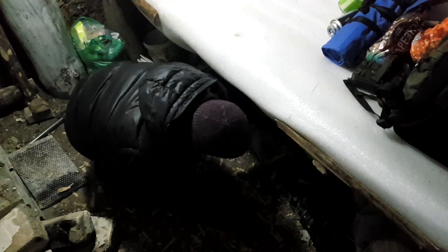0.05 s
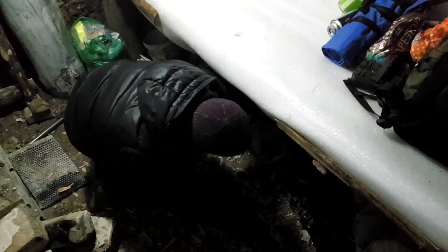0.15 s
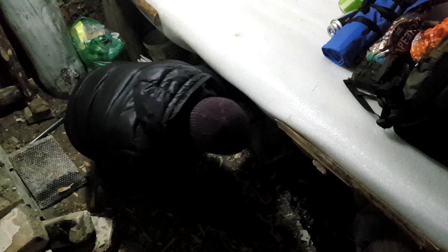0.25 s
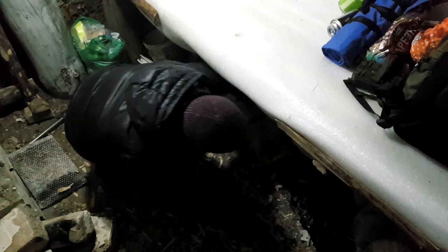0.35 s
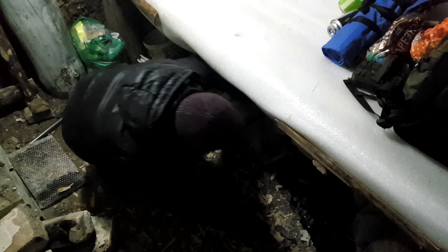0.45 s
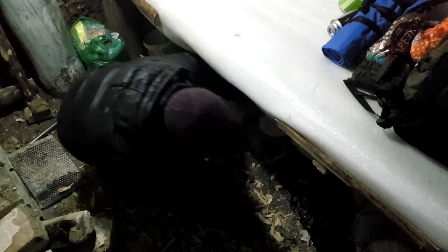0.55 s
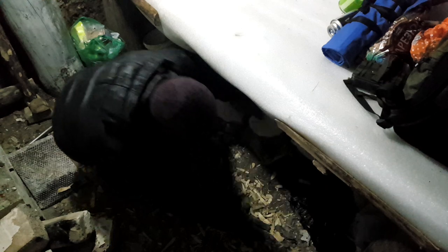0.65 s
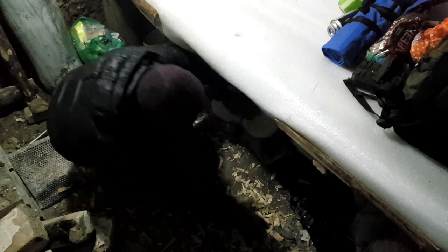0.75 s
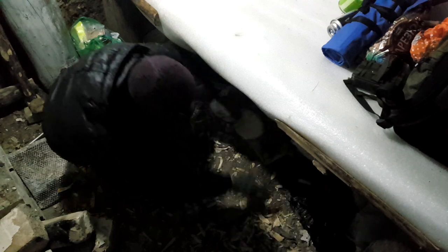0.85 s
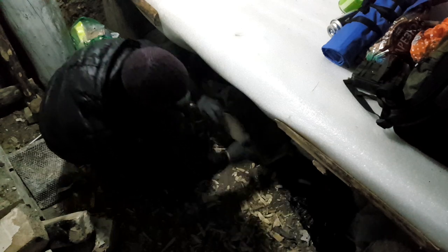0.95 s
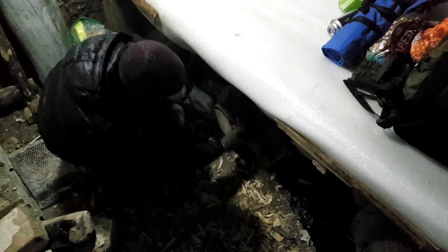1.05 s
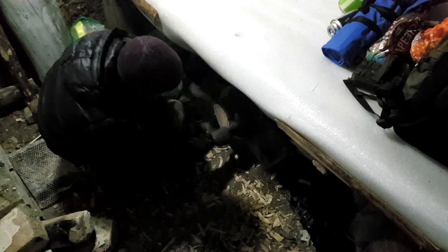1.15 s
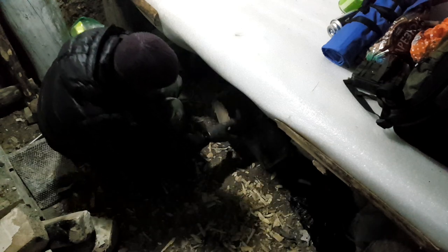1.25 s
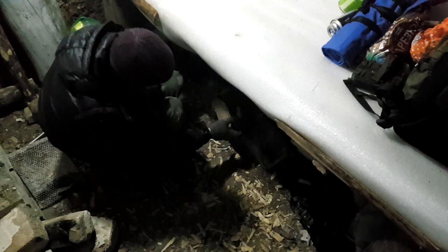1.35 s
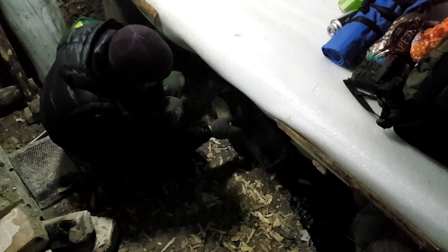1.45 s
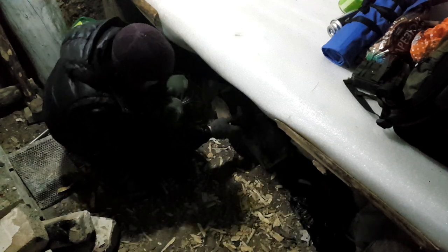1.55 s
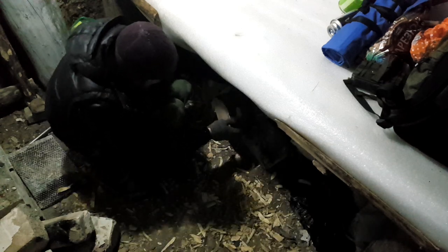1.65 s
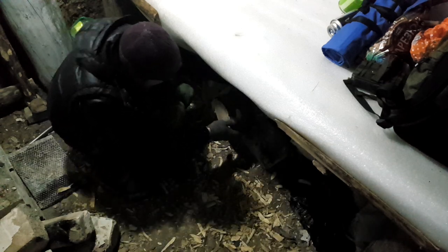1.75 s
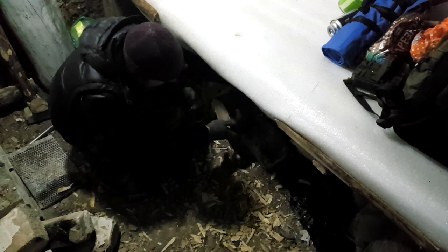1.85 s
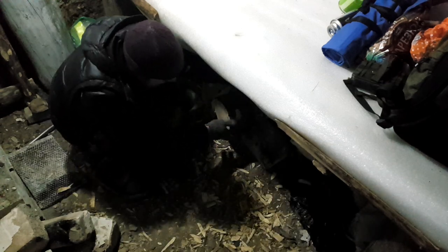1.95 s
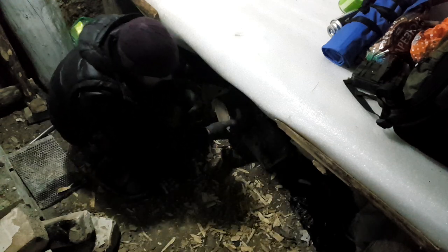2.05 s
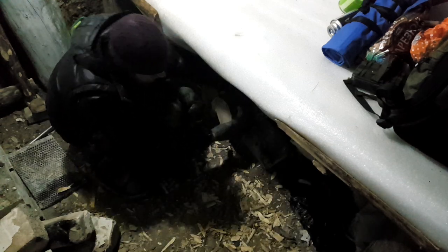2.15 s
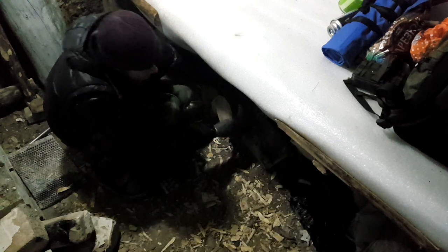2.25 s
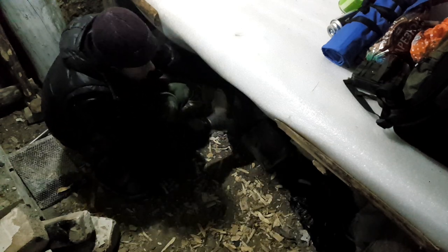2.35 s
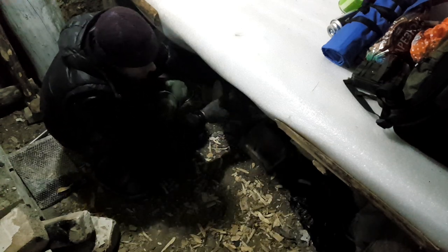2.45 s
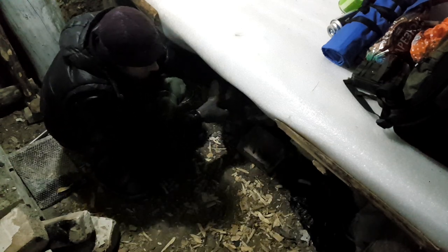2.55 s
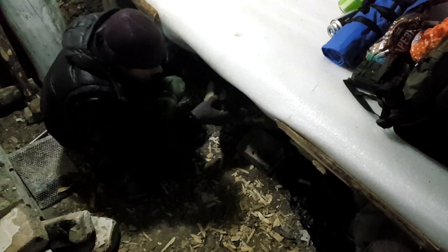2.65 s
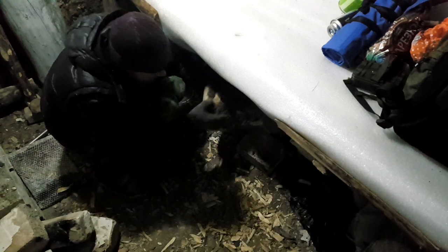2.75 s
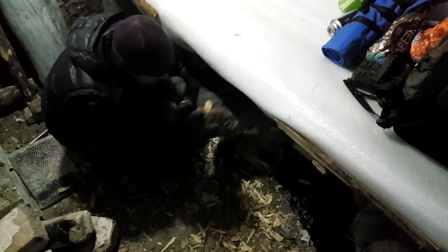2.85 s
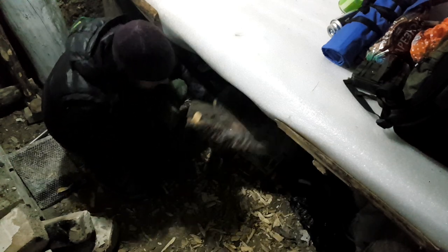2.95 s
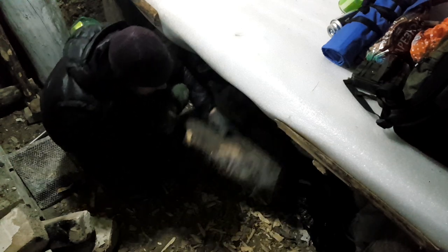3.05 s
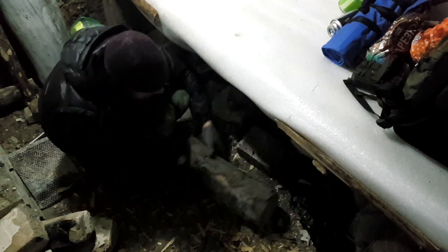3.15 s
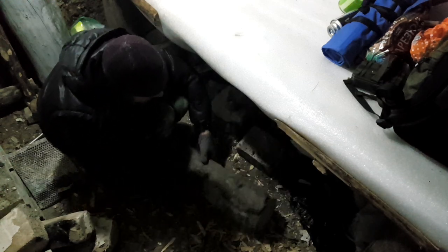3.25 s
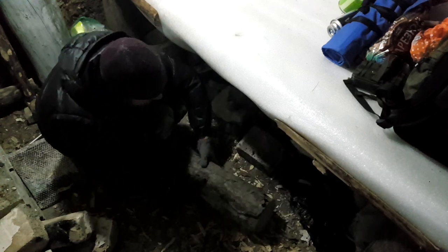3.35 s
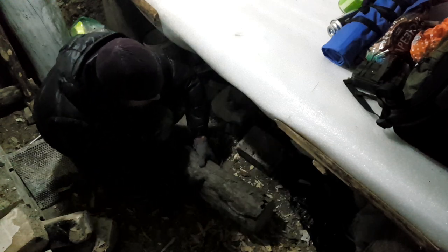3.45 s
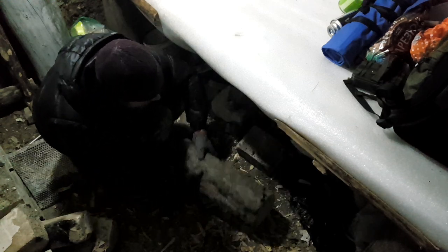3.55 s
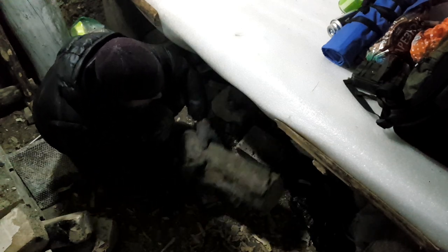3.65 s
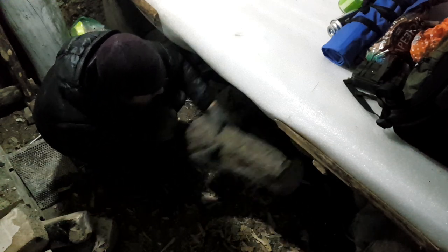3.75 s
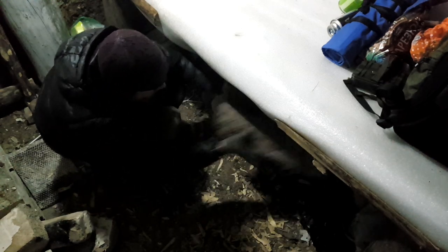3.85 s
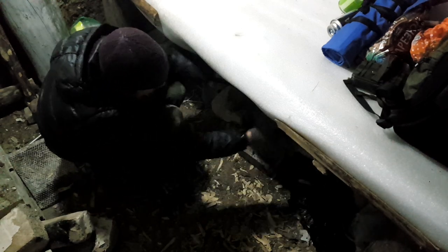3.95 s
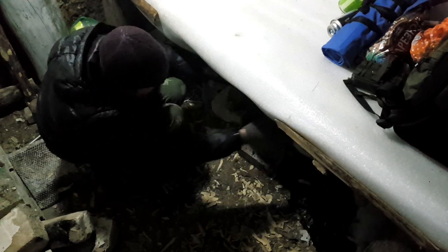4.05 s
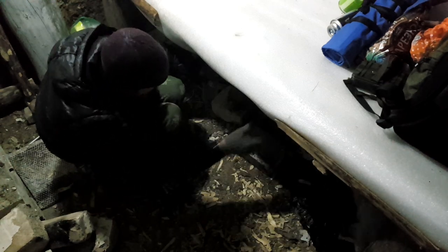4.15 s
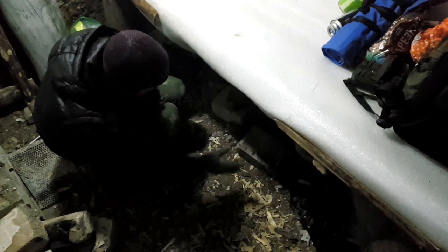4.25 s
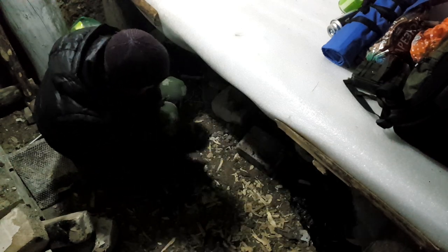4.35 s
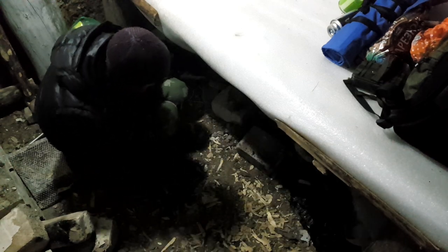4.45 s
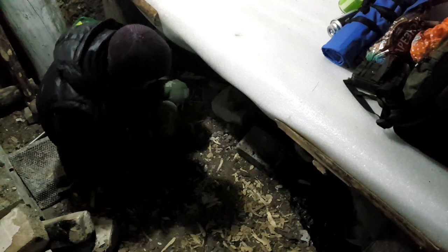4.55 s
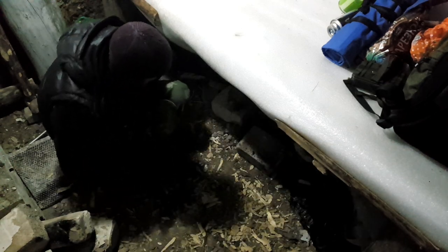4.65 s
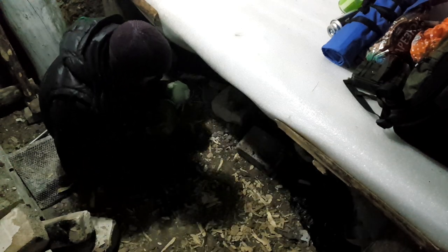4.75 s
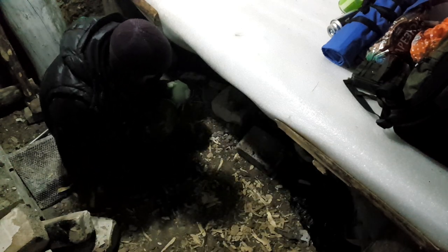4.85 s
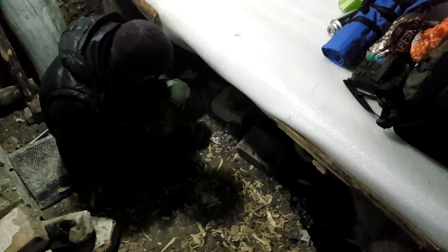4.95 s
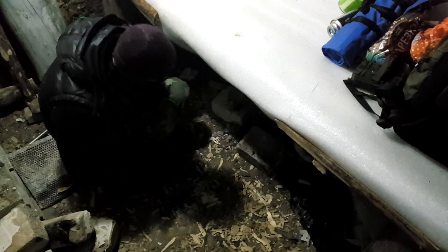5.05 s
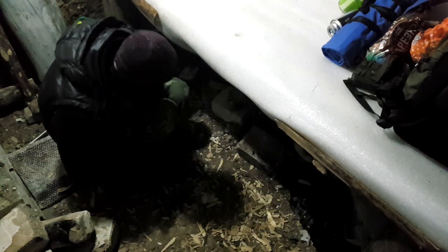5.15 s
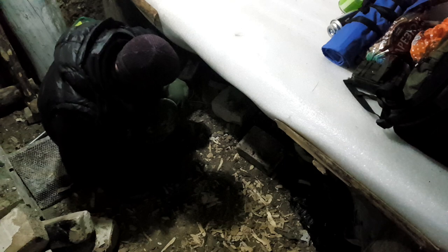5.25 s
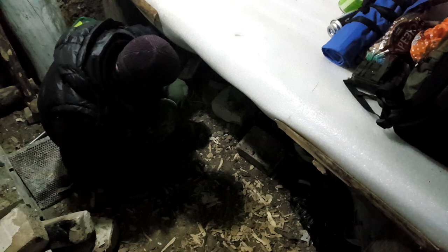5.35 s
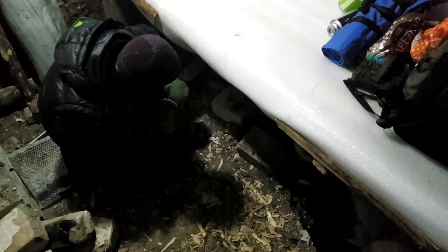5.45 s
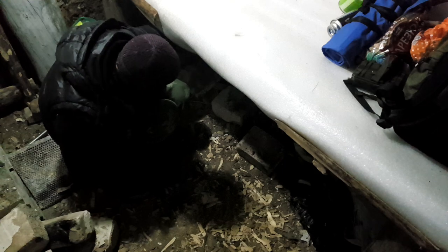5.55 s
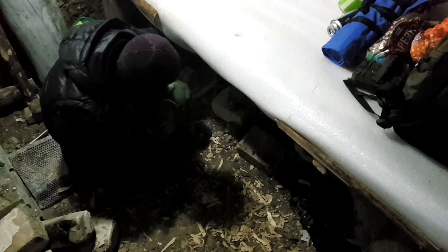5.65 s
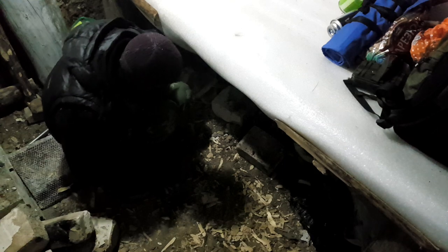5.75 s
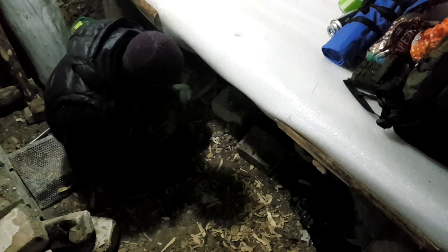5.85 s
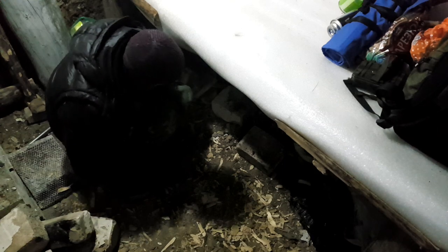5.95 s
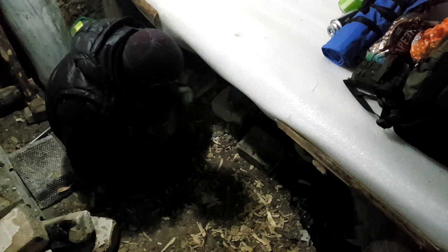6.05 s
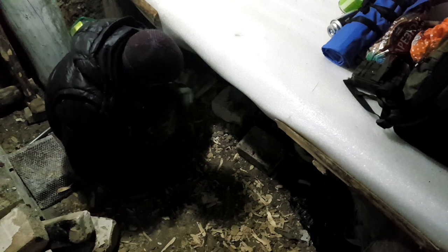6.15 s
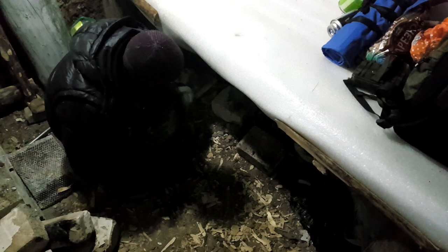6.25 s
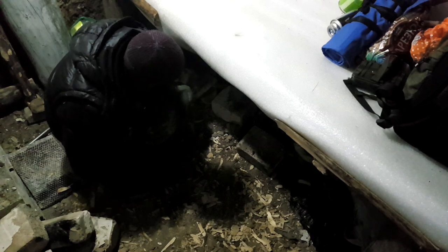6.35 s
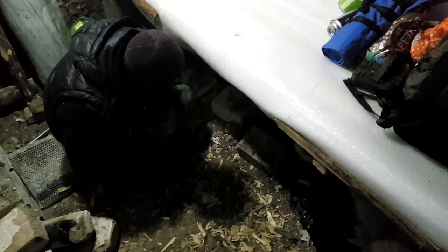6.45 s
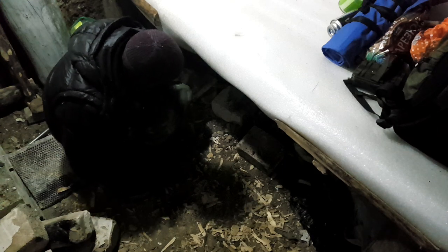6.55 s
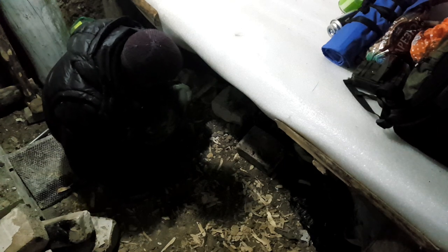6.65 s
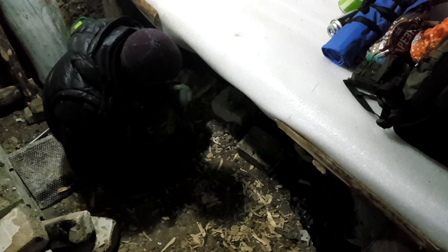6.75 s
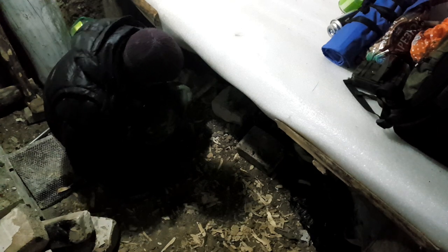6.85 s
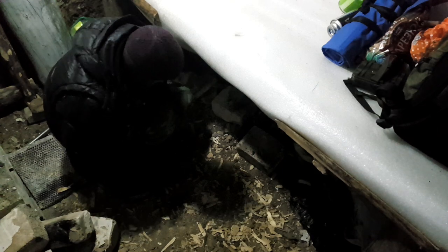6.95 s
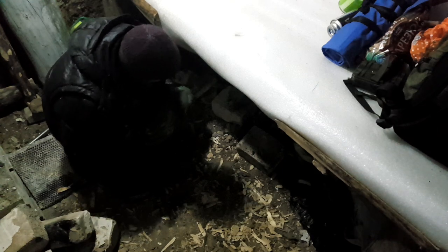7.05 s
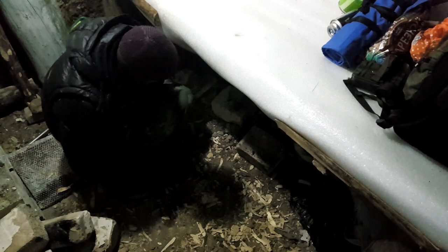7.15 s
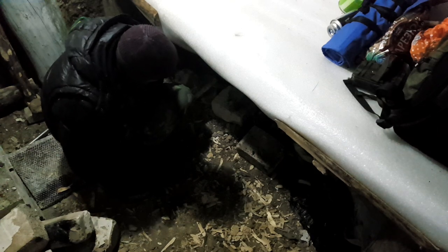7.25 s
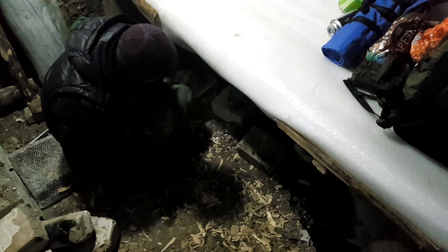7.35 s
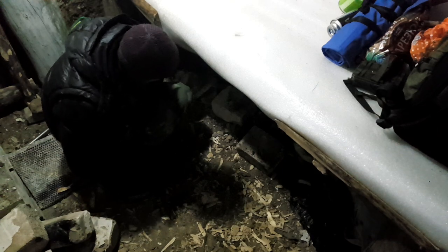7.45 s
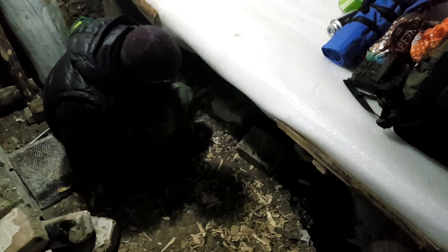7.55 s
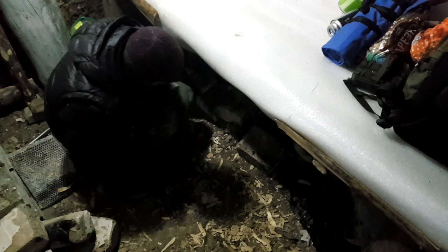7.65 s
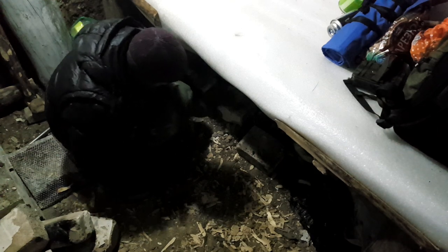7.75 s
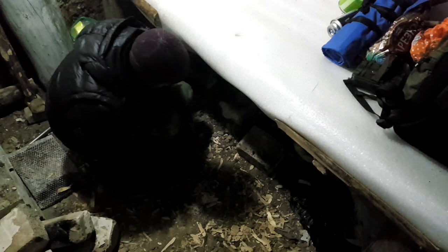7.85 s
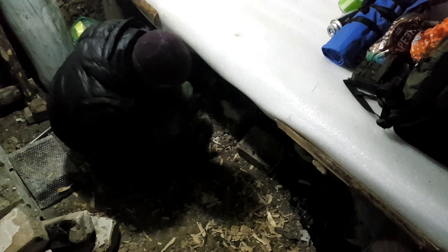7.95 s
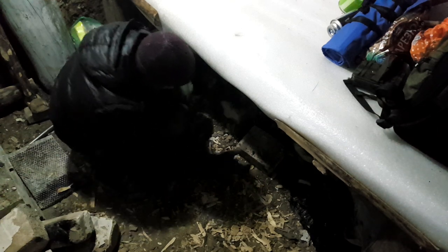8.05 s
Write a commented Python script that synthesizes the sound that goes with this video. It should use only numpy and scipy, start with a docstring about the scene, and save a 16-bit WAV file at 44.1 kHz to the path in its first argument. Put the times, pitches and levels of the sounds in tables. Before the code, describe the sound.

Someone shifts bricks on a dirt floor in a small shelter. Cloth rustles and grit rubs first, then a clattering scrape, lighter ticks and snapping chips. A brick lands hard with a double thud, another drops about a second later with deeper boom. A short falling squeak follows, then dull knocks, scrapes and rustling. Heard in stereo from just above, fairly dry, with faint hiss.

```python
"""Bricks moved over a dirt floor

Someone in a padded jacket crouches in a small shelter and moves bricks over dirt strewn with chips.
Bricks are damped modes driven by pushes and chatter; two heavy drops also boom in floor and room.
Random grains make drags, grit and the rustle of cloth and chips; chips snap as decaying noise.
Rubs and a squeak are rough gliding tones. Two ports above hear it all over faint hiss."""
import sys
import numpy as np
from scipy import signal
from scipy.fft import rfft, irfft
from scipy.io import wavfile
from scipy.ndimage import uniform_filter1d

SR = 44100
rng = np.random.default_rng(int(sys.argv[2]) if len(sys.argv) > 2 else 0)


def store_wav(level_fs):
    """Save 16-bit WAV to argv[1]."""
    pcm = np.round(np.clip(np.atleast_2d(level_fs), -1, 1) * 32767)
    wavfile.write(sys.argv[1], SR, pcm.T.astype(np.int16))


N = 357210  # samples

# Modes of a freely ringing brick. Each row: frequency in Hz, level in dB, 60 dB decay time in s.
BRICK_MODES = [(260, -21.5, 0.014), (308, 1.5, 0.21), (342.5, 0.5, 0.14), (430, 3.5, 0.07),
               (550, 0.5, 0.075), (702, -6, 0.15), (931, -10, 0.034), (1142.5, -9.5, 0.17),
               (1317, -9.5, 0.084), (1467, -6, 0.091), (1721, -4, 0.071), (2025, -1.5, 0.045),
               (2520, -11.5, 0.048), (2830, -7.5, 0.05), (3780, -11.5, 0.021)]
LOW_MODES = 6  # the first rows of the brick; the rest are its high modes
# Low modes of floor and room. Each row: frequency in Hz, level in dB, 60 dB decay time in s.
BOOM_MODES = [(53.7, 1.2, .3), (68.2, 12.4, 0.29), (86.5, 12.6, 0.314), (105.1, 9.3, 0.22),
              (119.8, 6.7, 0.39)]


def undb(db):
    """Decibels to amplitude ratio: 20 dB is a factor of ten."""
    return 10 ** (np.asarray(db) / 20)


def unit(x):
    """Normalise to unit root-mean-square amplitude."""
    return x / np.sqrt(np.mean(x ** 2))


def peak(x, db):
    """Normalise the largest excursion to a level in dB."""
    return x * undb(db) / np.max(np.abs(x))


def gains(table, size):
    """Frequency response through (Hz, dB) points, interpolated over log frequency."""
    hz, db = np.transpose(table)
    bin_hz = np.arange(size // 2 + 1) * SR / size
    return undb(np.interp(np.log(bin_hz + 1), np.log(hz), db))


def colour(x, table):
    """Linear filtering: multiply the spectrum by a frequency response."""
    return irfft(rfft(x) * gains(table, N), N)


def add(track, s, x):
    """Superposition: sum a sound into the track from time s in seconds."""
    i = int(s * SR)
    track[..., i:i + x.shape[-1]] += x[..., :N - i]


def damped(modes, share):
    """Added damping: only a share of each mode's decay time is left."""
    return [(hz, db, share * t60) for hz, db, t60 in modes]


def ring(x, modes, db=0):
    """Modal synthesis: a force drives decaying resonators; db reweights them for this contact."""
    out = 0
    for (hz, own_db, t60), more_db in zip(modes, db + np.zeros(len(modes))):
        r = np.exp(-np.log(1000) / (t60 * SR))  # pole radius: decay per sample
        w = 2 * np.pi * hz / SR
        mode = signal.lfilter([0, r * np.sin(w)], [1, -2 * r * np.cos(w), r * r], x)
        out = out + undb(own_db + more_db) * mode
    return out


def walk(rate_hz):
    """Slow random modulation: levels held a moment and slewed, with a spread near 1."""
    k = int(SR / rate_hz)
    held = np.repeat(rng.standard_normal(N // k + 1), k)
    return 1.32 * uniform_filter1d(held, k)[:N]


def grains(rate_hz, spread_db, patchy_db, patch_hz):
    """Granular excitation: random clicks of unequal size that come in patches, along three paths."""
    hit = rng.random(N) < rate_hz / SR
    size_db = spread_db * rng.exponential(size=N) + patchy_db * walk(patch_hz)
    return hit * rng.standard_normal((3, N)) * undb(size_db)


def hiss():
    """Stationary background noise: shaped random noise at a steady level, independent on each path."""
    # Each row: frequency in Hz, relative level in dB per Hz.
    spectrum = [(30, -12.5), (75, 6.5), (134, -1.5), (189, -29), (287, -13.5), (822, -24.5), (2540, -25.5),
                (8520, -23), (12300, -13), (16000, -20)]
    return unit(colour(rng.standard_normal((3, N)), spectrum)) * undb(-66.5)


def scrapes():
    """Addition of powers: each scrape swells, holds and fades over the restless shifting."""
    # Restless shifting. Each row: time in s, then levels in dB of the rumble in floor and room,
    # of the drag on the dirt and of the rustle of cloth and chips.
    stir = [(0.0, -59, -70.5, -78), (0.399, -47, -53.5, -80), (0.65, -59, -79.5, -64.5),
            (1.05, -51, -72, -49), (1.45, -49.5, -53, -78), (1.85, -53.5, -53, -47),
            (2.3, -53.5, -62.5, -51.5), (3.1, -47.5, -51, -43), (3.16, -31.5, -62, -43),
            (3.43, -62, -75, -57), (3.7, -92, -81.5, -64), (3.988, -48.5, -80, -74),
            (4.078, -34.5, -67, -62), (4.502, -57.5, -70, -59.5), (4.737, -61, -68.5, -66),
            (5.03, -51, -59, -65), (5.41, -61, -53, -47), (5.5, -41.5, -53, -55.5), (5.9, -53.5, -72, -62),
            (6.0, -58.5, -78, -79), (6.2, -53, -66, -83), (6.47, -64, -57, -58), (6.57, -71.5, -77, -72),
            (6.74, -69, -80, -74), (6.97, -56, -75, -74), (7.33, -63, -74, -75), (7.622, -68, -81.5, -86),
            (7.76, -49.5, -63, -68), (7.92, -52, -64, -70), (8.1, -63, -69.5, -60)]
    # Scrapes. Each row: time of reaching full level in s, hold in s, swell and fade in s per 20 dB,
    # then levels in dB of the drag, of the grit on brick and of the rustle.
    strokes = [(0.199, 0.15, 0.16, 0.23, -78, -47, -40.5), (0.52, 0.014, 0.058, 0.076, -58, -55.5, -54.5),
               (0.88, 0.0033, 0.42, 0.097, -91, -55.5, -49.5), (1.01, 0.0092, 0.15, 0.1, -72, -48.5, -67),
               (1.24, 0, 0.06, 0.16, -70, -70, -43.5), (1.37, 0, 0.26, 0.19, -73, -49.5, -46.5),
               (1.49, 0, 0.021, 0.065, -56, -34, -38), (1.578, 0.036, 0.025, 0.052, -40, -33.5, -41),
               (2.295, 0.0046, 0.038, 0.11, -65, -53, -41.5), (2.371, 0.02, 0.09, 0.13, -68, -40, -44),
               (2.575, 0.057, 0.065, 0.15, -70, -46, -44), (2.93, 0.018, 0.048, 0.054, -46.5, -40.5, -47),
               (3.022, 0.052, 0.01, 0.048, -50, -64, -38.5), (3.09, 0, 0.021, 0.026, -55, -21.5, -26),
               (3.159, 0.043, 0.074, 0.13, -49, -53.5, -47),
               (3.76, 0.067, 0.032, 0.14, -86.5, -64.5, -55.5),
               (4.029, 0.057, 0.046, .05, -41, -60.5, -44.5),
               (4.069, 0.037, 0.011, 0.068, -41.5, -27.5, -37), (4.14, 0.071, 0.048, 0.24, -43.5, -40, -41),
               (4.831, 0.17, 0.11, 0.68, -64, -53, -53.5), (5.19, 0.03, 0.17, 0.46, -79, -50, -49),
               (5.5, 0.02, 0.079, 0.15, -45, -41.5, -51.5), (5.604, 0.0058, 0.015, 0.12, -36, -40, -55),
               (5.756, 0.0029, 0.019, 0.067, -55, -42, -68), (5.82, 0.06, 0.11, 0.073, -48.5, -47, -43),
               (5.909, 0.0063, 0.035, 0.035, -64, -36.5, -56), (6.138, 0, 0.4, 0.58, -52.5, -57, -53.5),
               (6.77, 0.075, 0.022, .05, -54.5, -51, -51.5), (6.825, 0.022, 0.051, 0.061, -70, -42, -44.5),
               (6.97, 0.016, 0.069, 0.24, -58.5, -74, -59), (7.09, 0.038, 0.016, 0.083, -47, -46.5, -45.5),
               (7.408, 0.0013, 0.0064, 0.031, -82.5, -88.5, -71),
               (7.67, 0.008, 0.051, 0.042, -84.5, -84, -63), (7.743, 0.086, 0.0068, 0.074, -67, -58, -57),
               (7.825, 0.016, 0.019, 0.084, -46, -44, -41), (7.942, 0.014, 0.025, 0.064, -72, -65, -52)]
    t = np.arange(0, N / SR, .002)
    s, *columns = np.transpose(stir)
    rumble_db, drag_db, rustle_db = (np.interp(t, s, c) for c in columns)
    grit_db = drag_db - 3.5
    power = undb([drag_db, grit_db, rustle_db]) ** 2
    for s, hold, swell, fade, *db in strokes:
        under_db = 20 * np.maximum(np.maximum((s - t) / swell, (t - s - hold) / fade), 0)
        power = power + undb(np.array(db)[:, None] - under_db) ** 2
    levels = [undb(rumble_db), *np.sqrt(power)]
    return [np.interp(np.arange(N) / SR, t, level) for level in levels]


def crushed_grit():
    """Resonant and direct radiation: grains stir the damped high brick modes and sound by themselves."""
    # crumbs that crush suddenly and die away
    bursts = (rng.random(N) < 45 / SR) * rng.random(N)
    crush = signal.lfilter([1], [1, -np.exp(-1 / (0.011 * SR))], bursts)
    grit = grains(5000, 1.6, 2.7, 40) * (1 + 0.9 * crush)
    # each mode swells and fades alone, with a spread near 4 dB
    high_modes = damped(BRICK_MODES, 0.16)[LOW_MODES:]
    ringing = sum(undb(4 * walk(9)) * ring(grit, [mode]) for mode in high_modes)
    bare = colour(grit, [(500, -10.5), (1000, -2.0), (3500, -1.5), (7000, -18.5)])
    return unit(ringing) + unit(bare)


def movement():
    """Friction as random impacts: shifts shake the room, drags stir the brick, cloth and chips crackle."""
    # Spectrum of cloth and chips. Each row: frequency in Hz, relative level in dB per Hz.
    rustle_spectrum = [(1470, -9), (2500, -6), (3520, -8.5), (6550, -10), (8660, -17), (12300, -6),
                       (15200, -10), (16000, -52.5)]
    rumble = ring(grains(470, 2.5, 4.7, 11), BOOM_MODES)
    held_brick = damped(BRICK_MODES, 0.18)  # the hand damps the brick
    drag = ring(grains(1500, 0.79, 3.7, 25), held_brick[:LOW_MODES])
    drag = colour(drag, [(150, -28.5), (240, 10.0)])
    grit = crushed_grit()
    rustle = colour(grains(10000, 1.1, 2.04, 35), [(600, -27.5)] + list(rustle_spectrum))
    return sum(level * unit(x) for level, x in zip(scrapes(), (rumble, drag, grit, rustle)))


def thumps():
    """Low-frequency excitation: soft contacts stir modes of floor and room, each in its own mix."""
    # Weight set down on the floor. Each row: start in s, peak level in dB ahead of the low-pass.
    set_downs = [(0.149, -51.5), (0.249, -29), (0.507, -34), (0.876, -32.5), (0.949, -37), (1.038, -33.5),
                 (1.474, -21), (1.569, -26.5), (1.617, -38), (1.872, -45.5), (2.007, -36), (2.309, -30),
                 (2.422, -37.5), (2.511, -37), (2.581, -32), (2.642, -35), (2.853, -34), (2.93, -36.5),
                 (3.168, -37), (3.26, -40.5), (4.147, -32.5), (5.389, -29.5), (5.499, -28), (5.608, -21.5),
                 (5.881, -35), (6.074, -36), (6.449, -43.5), (6.779, -35.5), (6.816, -34), (6.868, -29.5),
                 (7.096, -31.5), (7.399, -49.5), (7.75, -37), (7.795, -23.5), (7.849, -24.5)]
    contact_s = 0.009  # time to the top of the push envelope
    out, t = np.zeros((3, N)), np.arange(SR // 4) / SR
    noise = rng.standard_normal((len(set_downs), 3, len(t)))
    for (s, db), c in zip(set_downs, noise):
        push = c * t * np.exp(-t / contact_s)
        add(out, s, peak(ring(push, damped(BOOM_MODES, 0.8)), db))
    return signal.sosfilt(signal.butter(4, 150, fs=SR, output="sos"), out)


def rubs():
    """Amplitude-modulated glides: rough narrow tones swell quickly, waver in pitch and die away."""
    # Rubs that make one narrow band sing. Each row: start in s, length in s, first and last
    # frequency in Hz, level in dB ahead of the roughness and envelope.
    strokes = [(0.1, 0.084, 1820, 1950, -55.5), (0.17, 0.12, 1038, 942, -47),
               (0.214, 0.21, 2740, 2800, -45), (0.186, 0.11, 1950, 2080, -44.5),
               (0.247, 0.06, 1160, 1380, -47.5), (0.305, 0.077, 1690, 1630, -48),
               (1.555, 0.1, 1720, 1740, -41), (1.562, 0.11, 851, 910, -42), (4.185, 0.071, 1770, 1750, -41),
               (4.764, 0.054, 737, 746, -61), (5.284, .04, 1475, 1470, -50)]
    out = np.zeros((3, N))
    rough = np.array([walk(300) for _ in range(3)])
    waver = 1 + 0.0147 * walk(60)
    for s, length, first_hz, last_hz, db in strokes:
        u = np.arange(int(length * SR)) / (length * SR)  # progress from 0 to 1
        hz = (first_hz + (last_hz - first_hz) * u) * waver[int(s * SR):][:len(u)]
        phase = 2 * np.pi * np.cumsum(hz) / SR
        # a shifted stretch of the roughness for each rub
        texture = 0.64 + np.roll(rough, -len(u) - int(first_hz), axis=1)[:, :len(u)]
        envelope = np.sin(np.pi * u ** 0.35) ** 0.5
        add(out, s, undb(db) * texture * envelope * np.sin(phase))
    return out


def squeak():
    """Uneven stick and slip: a narrow, fluttering tone with wavering overtones and half lines."""
    # A squeaky scrape that sinks in pitch. Each row: time in s, pitch in Hz, level in dB ahead of
    # the flutter.
    glide = [(5.059, 2023, -66), (5.11, 1800, -51), (5.139, 1604, -52), (5.168, 1340, -50),
             (5.202, 1284, -41.5), (5.241, 1213, -45.5), (5.28, 1170, -53), (5.33, 1100, -68)]
    s, hz, db = np.transpose(glide)
    t = np.arange(N) / SR
    pitch_hz = np.interp(t, s, hz) * (1 + 0.03 * walk(200))
    phase = 2 * np.pi * np.cumsum(pitch_hz) / SR
    flutter = np.array([0.6 + 0.7 * walk(240) for _ in range(3)])
    # lines at 1.5, 2 .. 5 times the pitch, each wavering alone
    overtones = 0.15 * sum(np.sin(k * phase / 2) * walk(150) for k in range(3, 11))
    return undb(np.interp(t, s, db, -120, -120)) * (flutter * np.sin(phase) + overtones)


def snaps():
    """Impulsive fracture: a dry crack of a few milliseconds with a brief gritty tail."""
    # Chips that snap. Each row: start in s, peak level in dB ahead of the 0.5 dB cut and colouring.
    cracks = [(0.029, -35.5), (0.7483, -38), (1.16, -35), (1.228, -28), (1.4922, -38), (1.5289, -39),
              (1.572, -38), (1.5988, -34), (2.2354, -31.5), (2.3954, -26.5), (2.48, -32), (2.5607, -30),
              (2.645, -23), (2.755, -38), (2.95, -38), (3.0113, -27.5), (3.144, -26.5), (3.194, -40),
              (3.503, -47), (3.5892, -42.5), (3.7369, -39), (3.9252, -34.5), (4.034, -30), (4.0663, -41),
              (4.6753, -37), (5.371, -37), (5.486, -23), (5.598, -43), (5.7955, -31), (5.8184, -24),
              (5.963, -41), (6.022, -41), (6.0335, -44), (6.202, -38.5), (6.8136, -33), (6.948, -45),
              (7.407, -43), (7.741, -45), (7.8324, -24), (7.942, -36), (8.035, -46.5)]
    out, t = np.zeros((3, N)), np.arange(SR // 20) / SR
    envelope = np.exp(-t / 0.007) + 0.43 * np.exp(-t / 0.011)
    noise = rng.standard_normal((len(cracks), 3, len(t)))
    for (s, db), c in zip(cracks, noise):
        add(out, s, peak(c * envelope, db - 0.5))
    return colour(out, [(800, -20.5), (2500, -12.5), (6000, -0.5), (8500, -2), (12500, 4.0)])


def knocks():
    """Modal excitation by impact: a blow, then rough faces chatter; the spot struck picks the high modes."""
    # Knocks. Each row: start in s, peak level of the low modes in dB ahead of the high-pass, centre
    # of the high ring in Hz, its peak in dB over the low modes, decay constant of the chatter in ms.
    blows = [(0.387, -44.5, 1400, 13, 7.9), (0.499, -51, 1356, 4, 5.3), (1.006, -40, 1220, -42, 15),
             (1.227, -41.5, 2290, 2.5, 9.8), (1.488, -27.5, 925, -1, 24), (1.493, -42, 1760, 9.5, 11),
             (1.53, -30.5, 1740, 2.5, 9), (1.568, -30.5, 848, 1, 31), (1.608, -34, 890, 3, 12),
             (2.171, -56, 1400, 24, 17), (2.237, -57, 1650, 13.5, 7.9), (2.292, -46, 1930, 8, 5.3),
             (2.313, -49, 2000, 11, 7), (2.366, -43, 1750, 8, 6.5), (2.388, -47, 2800, -5, 7.2),
             (2.568, -48, 1900, 10, 9.7), (2.611, -49, 1610, 19, 4.1), (2.631, -50.5, 1480, 22.5, 4),
             (2.645, -42.5, 1720, 18, 5.6), (2.904, -47, 1570, -12.5, 8.3), (3.079, -12, 900, -15.5, 7.4),
             (3.093, -12.5, 802, -38, 5.8), (3.142, -46.5, 2800, 16.5, 4.5), (3.169, -45, 1690, 15, 6.4),
             (3.374, -47.5, 2810, -5, 7.6), (4.038, -16, 900, -27, 29), (4.067, -16, 1830, -5, 7.9),
             (4.111, -23.5, 1930, 6, 9.3), (4.118, -28, 3600, 4, 8.2), (4.187, -28, 1710, -5.5, 22),
             (4.243, -28.5, 1190, -5, 6), (4.814, -49, 1750, 11, 7.5), (4.929, -49, 1700, 15, 15),
             (5.367, -47.5, 970, 13, 36), (5.427, -36.5, 1450, 6.5, 4.3), (5.473, -26, 960, -7, 11),
             (5.53, -26.5, 1040, -14, 11), (5.597, -17.5, 1120, -4.5, 9.3), (5.753, -33, 1400, 14.5, 11),
             (5.792, -36, 980, -19, 9.4), (5.898, -33.5, 1620, 12.5, 8.4), (6.105, -33, 1040, -8, 8.8),
             (6.263, -37, 1090, 2.5, 6.3), (6.444, -43, 1280, -0.5, 4.4), (6.769, -38.5, 2030, 2, 17),
             (6.839, -30.5, 1550, -5, 22), (7.082, -28, 1200, -1.5, 18), (7.135, -28, 2510, -7, 4.9),
             (7.796, -34, 808, -3, 8.7)]
    rise_s = 0.00083
    free_db, ring_per_db = -17, .4  # softer blows ring shorter up high: dB of ring time per dB
    out, t = np.zeros((3, N)), np.arange(SR // 6) / SR
    modes = damped(BRICK_MODES, 0.72)  # a held brick
    high_hz = np.array(BRICK_MODES)[LOW_MODES:, 0]
    noise = rng.standard_normal((len(blows), 3, len(t)))
    for (s, db, centre_hz, high_db, ms), c in zip(blows, noise):
        chatter = c * np.exp(-1000 * t / ms) * (1 - np.exp(-t / rise_s))
        chatter[:, 0] += 4 * np.sign(c[:, 0])  # the first blow
        low = ring(chatter, modes[:LOW_MODES])
        octaves = np.log2(high_hz / centre_hz)
        favour_db = 7 * np.exp(-(octaves / 0.26) ** 2) - 13 * np.abs(octaves)
        ring_share = np.clip(undb(ring_per_db * (db - free_db)), .35, 1)
        high = ring(chatter, damped(modes[LOW_MODES:], ring_share), favour_db)
        add(out, s, peak(low, db) + peak(high, db + high_db))
    return signal.sosfilt(signal.butter(2, 210, "high", fs=SR, output="sos"), out)


def drops():
    """Contact time as low-pass: a rounded push into dirt; long contact leaves only the low modes."""
    # Heavy drops, each landing on one edge and then flat. Each row: start in s, peak of the brick
    # in dB, half the length of the push in ms, peak of the boom in dB over the brick.
    landings = [(3.079, -10, 1.58, -2.5), (3.093, -8.5, 1.16, -2.5), (3.102, -18, 3.9, -8.5),
                (4.035, -11, 3.82, 5.5), (4.062, -13.5, 6.5, 1.5)]
    out = np.zeros(N)
    for s, db, half_ms, boom_db in landings:
        push = np.zeros(SR // 2)
        u = np.arange(int(half_ms * SR / 500)) * 500 / SR / half_ms  # progress from 0 to 1
        push[:len(u)] = np.sin(np.pi * u) ** 2 * np.cos(np.pi * u)  # positive, then negative
        brick = ring(push, damped(BRICK_MODES, 0.28))  # dirt damps the brick
        boom = ring(push, BOOM_MODES)
        add(out, s, peak(brick, db) + peak(boom, db + boom_db))
    return out


def ports(paths):
    """Partial coherence: both ports share the direct path; own scattered paths rule the treble."""
    # Balance of the ports. Each row: frequency in Hz, left minus right in dB.
    tilt = [(60, -3.5), (400, -2), (1300, -1.5), (4400, -1.2), (8000, -6.5), (15000, -6.5)]
    # Scattered sound. Each row: frequency in Hz, level in dB over the direct path.
    diffuse = [(60, -25), (130, -5.5), (250, -4), (500, -2.5), (1000, 9.5), (4000, 12), (15000, 28.5)]
    wet = gains(diffuse, N)
    lean = np.sqrt(gains(tilt, N)) ** np.array([[1], [-1]])
    spectra = rfft(paths)
    mixed = (spectra[0] + wet * spectra[1:]) / np.sqrt(1 + wet ** 2)
    return irfft(lean * mixed, N)


def scene():
    """Superposition: all sources add on three paths, which the two ports combine."""
    background = hiss() + movement() + thumps()
    friction = rubs() + squeak()
    impacts = snaps() + knocks() + drops()
    return ports(background + friction + impacts)


def record(dry):
    """Band limiting: the pickup cuts the deep bass and the top."""
    dry = signal.sosfilt(signal.butter(4, 46, "high", fs=SR, output="sos"), dry)
    return signal.sosfilt(signal.ellip(10, .2, 70, 15950, fs=SR, output="sos"), dry)


dry = scene()
out = record(dry)
store_wav(out)
```